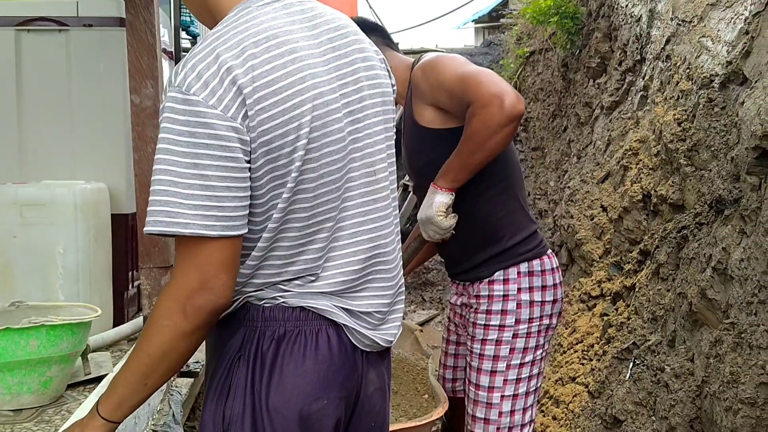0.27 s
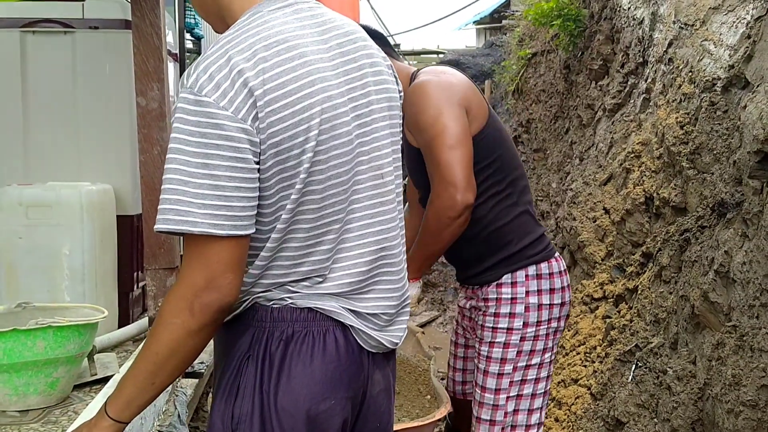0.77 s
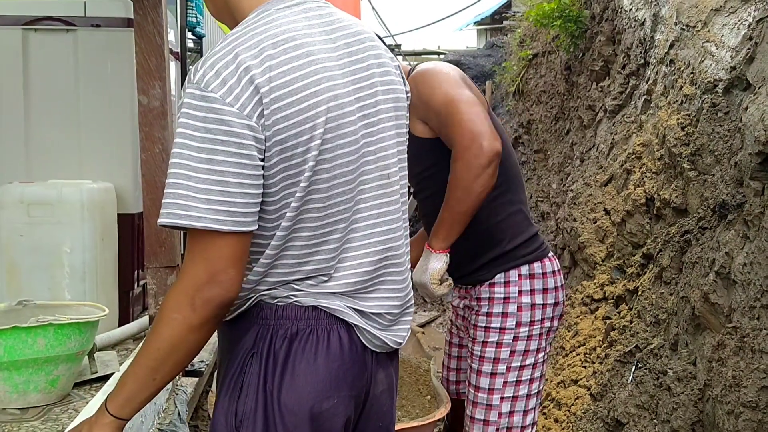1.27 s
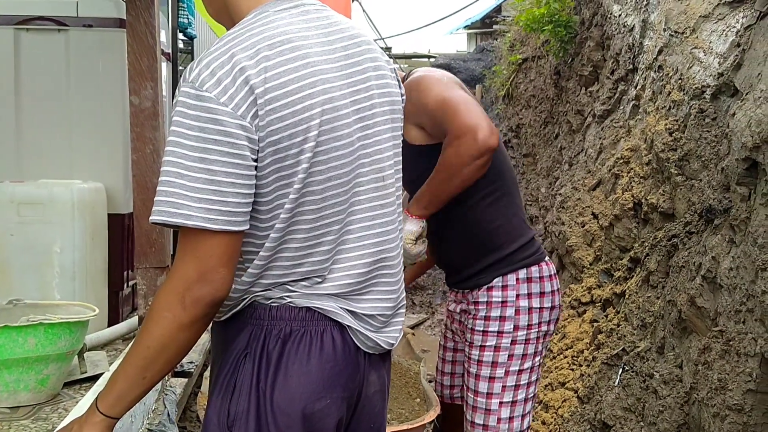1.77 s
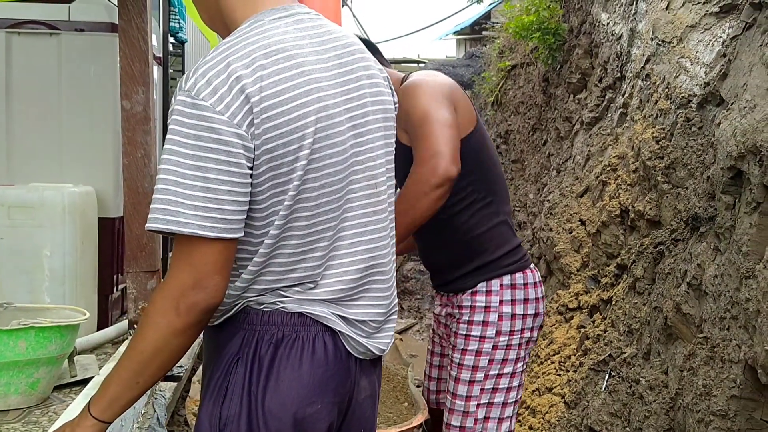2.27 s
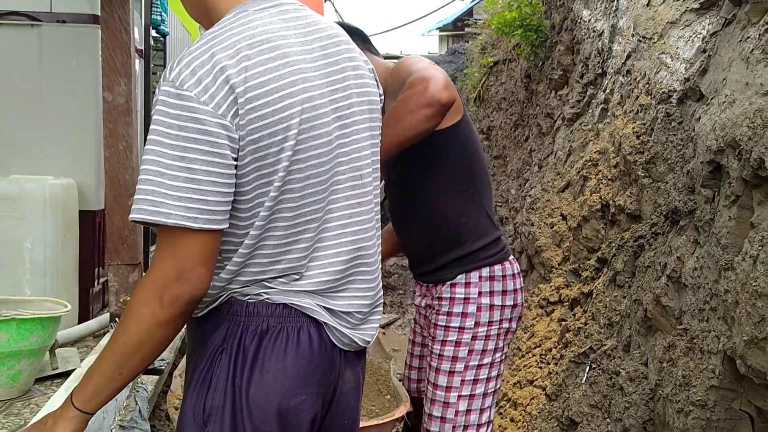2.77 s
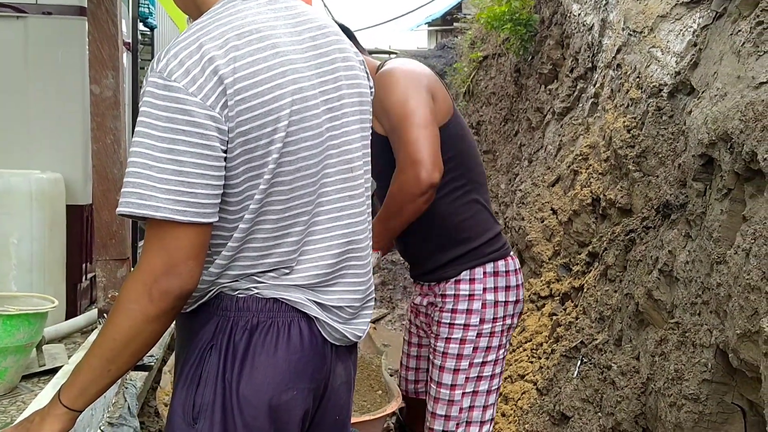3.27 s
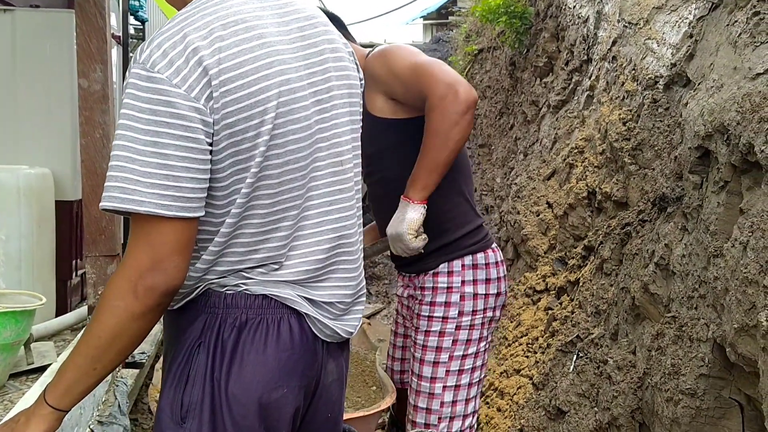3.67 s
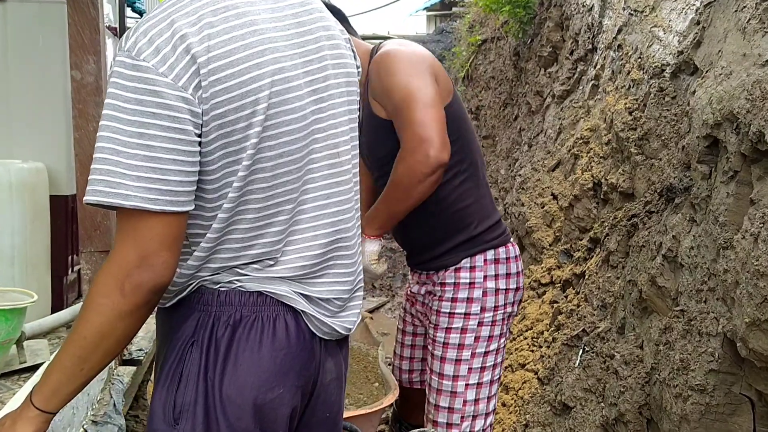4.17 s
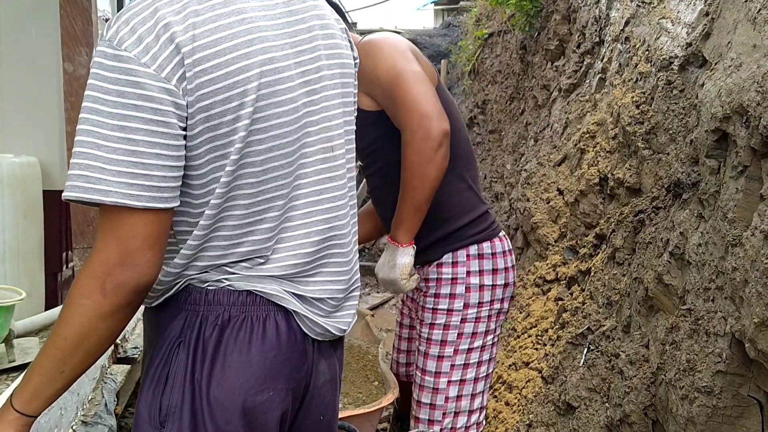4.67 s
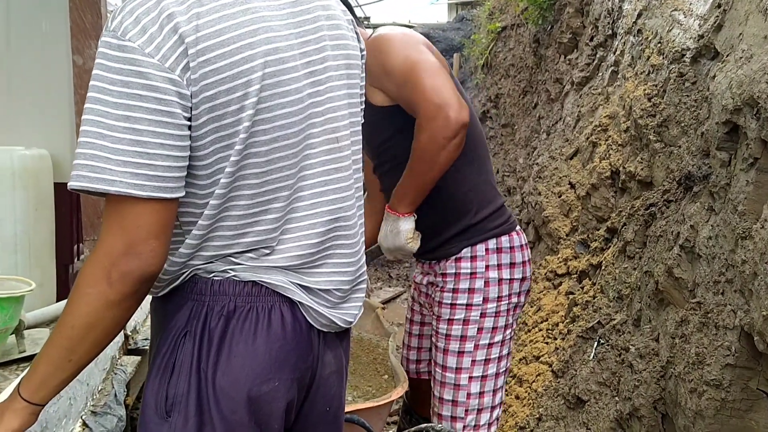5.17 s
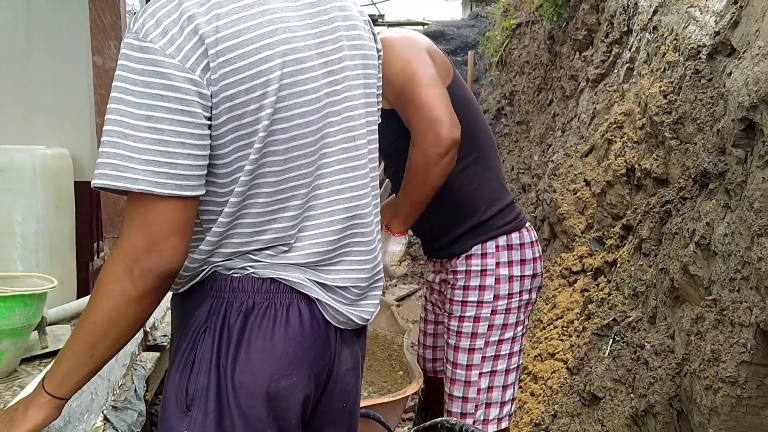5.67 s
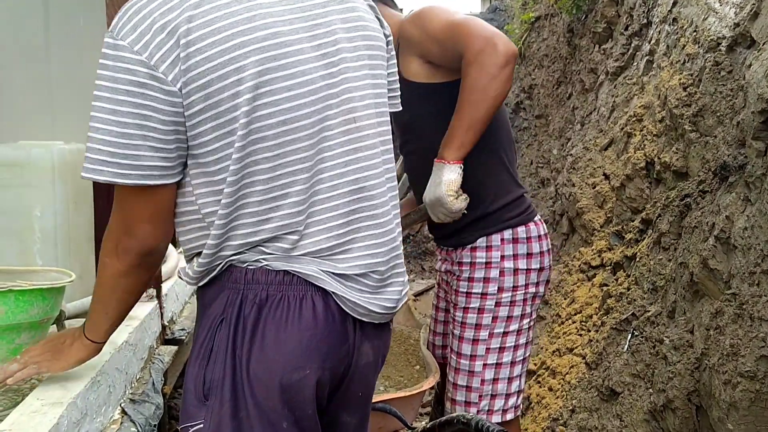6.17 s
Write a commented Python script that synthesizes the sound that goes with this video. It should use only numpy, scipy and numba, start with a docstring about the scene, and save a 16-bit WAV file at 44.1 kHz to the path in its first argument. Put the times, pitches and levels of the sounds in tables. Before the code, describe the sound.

A shovel crunches into gritty wet mortar close to the microphone in a narrow outdoor yard. Its short, grainy strokes come at about 0.2, 0.9, 1.6 to 1.9, 2.6, 3.4, 4.2, 5 and 6 seconds, some in quick clusters. Struck stones clink and ring briefly in most strokes, and small pebbles tick down softly between them. Further off, a rooster crows hoarsely once from about 1.2 to 3.4 seconds, with two short syllables and a long, rough, falling one. Another rooster is heard very faintly from afar at about 0.6 seconds and again from 5.4 to 6 seconds. Small birds give quiet, husky chirps and trills in the first second and mostly between 3.2 and 5 seconds. Underneath, a low motor drone and a soft distant rustle continue throughout, along with a barely audible pulsing cricket.

```python
"""A shovel crunches into gritty wet mortar again and again, close by in a narrow yard: grains crack under
the blade, struck stones ring, pebbles fall. Further off a rooster crows hoarsely, the two membranes of
its syrinx beating against each other, and another answers faintly from afar. Small birds trill,
a cricket pulses, a motor drones."""
import sys
import numpy as np
from scipy import signal
from scipy.io import wavfile
from scipy.ndimage import uniform_filter1d
from numba import njit

SR = 44100
rng = np.random.default_rng(int(sys.argv[2]) if len(sys.argv) > 2 else 0)


def to_wav(s):
    """Save 16-bit WAV."""
    ch = np.atleast_2d(s).T  # columns
    pcm = np.round(np.clip(ch, -1, 1) * 32767)  # PCM
    wavfile.write(sys.argv[1], SR, pcm.astype(np.int16))


N = 283062

# Hiss bands of fine sand. Each row: centre in Hz, width in Hz, gain in dB.
SAND_MODES = [(4990, 870, 2), (7380, 2800, -2.5), (9400, 1130, -5.5), (13400, 5100, -7)]


def shovel():
    """Grains of all sizes crack under the blade: it bites, slides ever softer, and stops."""
    # Each row: start in seconds, grit level in dB, bite re grit in dB, slide in seconds,
    # decay rate factor, then boom, thud, rasp and sand re grit in dB.
    strokes = [(0.2, -25, -1, 0.024, 0.95, -6, -12, 3, 1.5),
               (0.227, -21.5, -5, 0.017, 1.1, -7, 0, 5.5, -12),
               (0.934, -15, 12.5, 0.028, 1.06, -10, 0, -3, -11.5),
               (1.017, -29, 3.5, 0.022, 0.93, -14, -23, 3.5, -10),
               (1.055, -29.5, -3, 0.033, 1.1, -22, -13, 3, -5.5),
               (1.588, -15.5, -0.5, .1, 1.18, -12, -3, -2, -11.5),
               (1.702, -20, 5, 0.064, 0.8, -5.5, -6.5, -1.5, -14),
               (1.766, -22.5, 13, 0.028, 1.04, -18, -11, 2.5, -8),
               (1.863, -18, 9, 0.017, 1, -8, -1.5, -5.5, -18.5),
               (2.572, -15.5, 0, .09, 1.05, -13, 1.5, -1.5, -9),
               (3.43, -17, -2, 0.054, 1.04, -24, -5.5, -0.5, -8),
               (3.495, -22.5, 1, 0.035, 0.97, -18, -3, 3.5, -7.5),
               (4.172, -14, 6, .1, 0.98, -18.5, 0, -5, -14),
               (4.995, -15, -3, 0.051, 0.87, -5.5, -6.5, -3, -11),
               (5.066, -14.5, 1.5, 0.017, 1.3, -15, -1, -6, -19),
               (5.085, -16, 2, .075, 0.96, -20, -4, -2, -10.5),
               (5.941, -30, -2, 0.029, 0.63, -9, -13, 5, -1.5),
               (5.962, -18.5, -8, 0.033, 1.25, 3, 0, 2, -7), (6.055, -23.5, 4.5, .01, 1.5, -3, -3, -9, -4),
               (6.076, -18.5, 10.5, 0.024, 1.32, -5.5, -1, -2.5, -14.5)]
    # Resonances. Each row: centre in Hz, width in Hz, gain in dB.
    blade_modes = [(515, 51, 2), (813, 92, 3), (1010, 99, 3.5), (1255, 250, -1), (1470.5, 58.7, 2.5),
                   (1710, 146, -5.5)]
    boom_modes = [(93, 16.7, -8), (155, 64, -3)]
    thud_modes = [(274.4, 128, 0), (373, 141, -0.5)]
    rasp_modes = [(1933, 374, -0.5), (2160, 453, 1), (2660, 428, -0.5), (3386, 356, -5.5),
                  (3550, 222, -4.5)]
    # One value per part: grit, boom, thud, rasp, sand. Each stroke scales the two decay rates.
    slide_decay = [116, 150, 133, 60, 60]
    stop_decay = [332, 250, 292, 342, 330]
    rise_s = [0.0028, 0.013, 0.0052, 0.0021, 0.003]  # deep parts come late
    bite_colour_db, bite_t60_s = [-2, -10, 1, -3.8, -7.7], 0.035
    power, t = np.zeros((5, N)), np.arange(SR // 2) / SR
    column = lambda v: np.array(v)[:, None]
    for start_s, db, bite_db, slide_s, pace, *parts_db in strokes:
        slid_s = np.minimum(t, slide_s)
        fall_db = pace * (column(slide_decay) * slid_s + column(stop_decay) * (t - slid_s))
        bite = undb(bite_db + column(bite_colour_db)) * 1000. ** (-t / bite_t60_s)
        attack = np.minimum(t / column(rise_s), 1)
        env = attack * undb(db + column([0] + parts_db)) * np.hypot(undb(-fall_db), bite)
        span = power[:, int(start_s * SR):][:, :len(t)]
        span += env[:, :span.shape[1]] ** 2
    # the whole blade sticks and slips; each part also chatters alone
    judder = undb(0.68 * walk(90) + np.array([1.88 * walk(150) for _ in range(5)]))
    sizes = undb(3.625 * np.minimum(rng.exponential(size=N), 3.5))
    grains = unit(rng.standard_normal((5, N)) * sizes * judder)
    part_modes = (blade_modes, boom_modes, thud_modes, rasp_modes, SAND_MODES)
    return sum(body(part, modes) for part, modes in zip(np.sqrt(power) * grains, part_modes))


def stones():
    """Struck stones ring and decay, their pitch shaken by the mortar around them."""
    # Each row: start in seconds, pitch in Hz, peak in dB, T60 in seconds.
    strikes = [(0.938, 2600, -8.5, 0.027), (0.94, 933, -11.5, 0.19), (.941, 1410, -13, 0.098),
               (1.018, 1474, -22.5, 0.31), (1.02, 3550, -24, 0.083), (1.591, 1286, -17.5, 0.12),
               (1.704, 1437, -7, 0.027), (1.77, 2930, -10.5, 0.058), (1.8649, 1170, -0.5, 0.019),
               (1.8648, 2680, -4.5, 0.014), (2.576, 1536, -14, 0.19), (2.575, 274.7, -5, 0.16),
               (3.433, 2660, -5, 0.055), (3.434, 760, -14, 0.023), (4.174, 500, 0, 0.023),
               (4.998, 1560, -12.5, 0.056), (5.075, 790, -11.5, 0.059), (5.98, 155, -18, 0.099),
               (6.0802, 1010, -1, 0.015), (6.093, 1144, -16.5, 0.18), (5.452, 452, -38.5, 0.036),
               (6.285, 464, -31.5, 0.04)]
    out, shake = np.zeros(N), walk(150)
    for start_s, hz, db, t60_s in strikes:
        span, env = fading(start_s, t60_s)
        pitch_hz = hz * (1 + 0.025 * shake[span])
        out[span] += undb(db) * env * np.sin(2 * np.pi * np.cumsum(pitch_hz) / SR)
    return out


def pebbles():
    """Falling pebbles and clods: each a short tick with a puff of dust."""
    # Each row: start in seconds, level in dB, centre in Hz, dust re tick in dB.
    falls = [(0.0132, -37.5, 4860, -5), (0.0928, -40.5, 1430, 3), (.1471, -31.5, 1970, -30),
             (.3504, -40.5, 2920, 0), (0.3766, -36, 6850, -19), (0.6273, -33.5, 1300, -12),
             (0.645, -33.5, 1330, -5), (.6702, -34.5, 1270, -5), (.828, -27.5, 2670, -12.5),
             (2.8404, -38, 1912, -9), (2.9, -37.5, 1900, -27), (4.5795, -44, 2740, -9),
             (5.3207, -30, 1370, -15), (5.3595, -44, 3200, -6), (5.5563, -36, 2660, 6.5),
             (5.604, -41.5, 2380, -5.5), (5.665, -35, 1150, -17), (5.6838, -42.5, 2200, -1.5),
             (6.2364, -41, 1880, -1), (6.263, -41.5, 2170, -3), (6.3678, -43.5, 1642, 3.5)]
    out, noise = np.zeros(N), rng.standard_normal(N)
    dust = body(rng.standard_normal(N), SAND_MODES)
    for start_s, db, hz, dust_db in falls:
        span, env = fading(start_s, t60_s=0.045)
        tick = unit_band(noise[span], hz, 0.493 * hz)
        out[span] += undb(db) * env * (tick + undb(dust_db) * dust[span])
    return out


def rooster():
    """Two syrinx membranes beat against each other, adding sum and difference tones in the throat."""
    # Upper membrane, one list per syllable. Each row: time in seconds, pitch in Hz,
    # relative level in dB, roughness from 0 to 1.
    upper_syllables = [
        [(1.21, 779, -40, .3), (1.26, 794, -32.5, 0.44), (1.31, 796, -39.5, 0.35), (1.36, 760, -70, 0.54)],
        [(1.45, 820, -34.5, 0.05), (1.48, 855, -23, 0.16), (1.6, 850, -29, 0.23), (1.67, 840, -30, 0.27),
         (1.72, 833, -50, 0.33)],
        [(1.74, 846.5, -49, .1), (1.78, 850, -19, 0.14), (1.88, 850, -29, 0.21), (2.05, 831.4, -35.5, 0.58),
         (2.15, 829, -38.5, 0.54), (2.25, 830, -37.5, 0.46), (2.45, 804.4, -33.5, 0.42), (2.55, 791, -41, 0.3),
         (2.78, 774, -47, .35)],
    ]
    # Lower membrane. Each row: time in seconds, pitch in Hz, relative level in dB.
    lower_syllables = [
        [(1.21, 640, -55), (1.24, 640, -38), (1.37, 628, -65)],
        [(1.95, 676, -47), (2.05, 675, -45), (2.17, 669, -51), (2.27, 670, -42), (2.45, 656.3, -50),
         (2.53, 654, -37.5), (2.74, 626, -46), (2.88, 640.2, -37.5), (3.055, 607.6, -47.5), (3.075, 574.5, -43),
         (3.17, 560, -43.5), (3.23, 562, -43), (3.28, 506, -53), (3.36, 477, -53)],
    ]
    # Each row: centre in Hz, width in Hz, gain in dB.
    throat_modes = [(640, 216, 4), (850, 510, 1), (1656, 360, 0.5), (2350, 380, -4.5), (3300, 450, -7.5)]
    up_gate, (up_hz, up_db, up_rough) = contours(upper_syllables)
    low_gate, (low_hz, low_db) = contours(lower_syllables)
    low_rough = 0.09 + 0.605 * up_rough * up_gate  # partly caught from the upper membrane
    tuned_below_hz = 590  # below this pitch the throat is tuned to the third partial, which stands out
    tuned = np.clip((tuned_below_hz - low_hz) / 20, 0, 1)
    up_phase, upper = membrane(up_hz, up_rough, db_per_octave=-1.2, partials=4, jitter=0.06)
    low_phase, lower = membrane(low_hz, low_rough, db_per_octave=-2 - 6 * tuned, partials=5,
                                jitter=0.045, third_db=-1 + 16 * tuned)
    lower *= 1 + 0.2 * np.cos(low_phase / 2)  # every second cycle weaker
    up_env, low_env = up_gate * undb(up_db), low_gate * undb(low_db)
    coupling = np.cos(low_phase) + 0.63 * np.cos(2 * low_phase)
    beats = 1.06 * np.sqrt(up_env * low_env) * upper * coupling
    breath_env = 3 * up_rough * up_env * (1 + np.cos(up_phase)) + 8 * low_rough * low_env
    breath = breath_env * rng.standard_normal(N)
    voice = 0.22 * body(up_env * upper + 1.64 * low_env * lower + beats + breath, throat_modes)
    return signal.sosfilt(signal.butter(4, [520, 3800], "bandpass", fs=SR, output="sos"), voice)


def membrane(hz, rough, db_per_octave, partials, jitter, third_db=0):
    """Phase and pulse train of one syrinx membrane; roughness shakes period and amplitude."""
    wobble = 0.00297 * walk(25) + jitter * rough * (walk(300) + 0.35 * walk(60))
    phase = 2 * np.pi * np.cumsum(hz * (1 + wobble)) / SR
    waver_db = [1.4 * walk(30) for _ in range(partials + 1)]
    pulses = sum(undb(db_per_octave * np.log2(k) + waver_db[k] + third_db * (k == 3)) * np.cos(k * phase)
                 for k in range(1, partials + 1))
    return phase, pulses * undb(7.9 * rough * walk(150))


def far_rooster():
    """Only the two lowest partials of the answering crow carry this far."""
    # Each row: start in seconds, length in seconds, pitch in Hz, fall in Hz, relative level in dB.
    calls = [(0.61, 0.39, 690, 0.5, -56.5), (5.402, 0.15, 713, 28, -66), (5.617, .36, 891, 131, -62.5)]
    glides = [[(start_s, hz, db), (start_s + length_s, hz - fall_hz, db)]
              for start_s, length_s, hz, fall_hz, db in calls]
    gate, (hz, db) = contours(glides, ramp_samples=900)
    _, pulses = membrane(hz, rough=0.35, db_per_octave=1.16, partials=2, jitter=0.32)
    return gate * undb(db) * pulses


def birds():
    """Small birds: husky gliding whistles with a quick trill."""
    # Each row: start in seconds, length in seconds, pitch in Hz, glide in Hz, spread in Hz, level in dB.
    chirps = [(0.416, 0.049, 2530, -100, 200, -43), (0.489, 0.035, 2400, -6, 119, -38),
              (.545, 0.017, 2550, 0, 150, -42), (0.638, .044, 2840, 498, 80, -43),
              (.885, 0.026, 3625, 0, 60, -45), (3.233, 0.026, 2630, -100, 199, -44.5),
              (3.282, .034, 2503, -100, 200, -52), (3.384, 0.076, 2778, -3, 200, -44.5),
              (3.591, 0.057, 2810, -200, 200, -40), (3.789, 0.012, 2200, 250, 60, -46),
              (3.819, 0.062, 2720, -50, 218, -41), (3.98, .122, 3694, 0, 200, -56.5),
              (4.009, 0.06, 2790, -6, 200, -44.5), (4.066, 0.025, 2757, -53, 120, -35),
              (4.074, 0.026, 2350, -100, 80, -43.5), (4.102, .038, 2690, 0, 80, -48),
              (4.12, .03, 3050, 400, 50, -50), (4.148, 0.021, 3480, -300, 50, -45.5),
              (4.395, 0.13, 2750, -4, 200, -43.5), (4.736, 0.048, 3300, 0, 150, -57),
              (4.854, 0.18, 3320, -100, 150, -54.5), (5.679, 0.021, 2156, 2, 80, -44.5),
              (5.795, .03, 2150, 0, 79.7, -50)]
    out, trill_hz = np.zeros(N), 53
    for start_s, length_s, hz, glide_hz, spread_hz, db in chirps:
        t = np.arange(int(length_s * SR)) / SR
        husk = unit(uniform_filter1d(rng.standard_normal(SR // 4), size=110))[:len(t)]
        pitch_hz = hz + glide_hz * t / length_s + spread_hz * husk
        env = np.sin(np.pi * t / length_s) ** 0.27 * (1 + 0.27 * np.sin(2 * np.pi * trill_hz * t))
        out[int(start_s * SR):][:len(t)] += undb(db) * env * np.sin(2 * np.pi * np.cumsum(pitch_hz) / SR)
    return out


def insects():
    """One cricket pulses in a narrow band; many far ones blur into a hiss above it."""
    pulse_hz, level_db = 11.76, -69
    pulse = np.sin(2 * np.pi * (pulse_hz * np.arange(N) / SR + 0.92))
    gate = np.clip(2.2 * pulse + 0.5, 0, 1)
    cricket = gate * unit(svf(rng.standard_normal(N), hz=7620., width_hz=90.))
    hiss = unit_band(rng.standard_normal(N), hz=8900, width_hz=1300)
    return undb(level_db) * cricket + undb(level_db + walk(10)) * hiss


def yard():
    """Motor drone, distant bustle and rustle: third-octave noise bands, each flickering alone."""
    # Spectral shapes. Each row: frequency in Hz, relative density in dB.
    drone_bustle_shape = [(24, -49), (40, -80.5), (69, -2.5), (222, -5), (309, -13.5), (635, -18.5),
                          (687, -8), (834, -25), (1410, -15), (1680, -23.5), (2960, -17.5), (4200, -56.5),
                          (5460, -69), (9240, -120)]
    rustle_shape = [(4200, 17), (5300, -3.5), (7000, 7), (10500, -6), (12500, -5.5), (15000, 2)]
    # Each row: time in seconds, then drone, bustle and rustle levels in dB.
    levels = [(0, -39.5, -48.5, -54.5), (.89, -38, -47, -53.5), (1.2, -44.5, -50, -58.5),
              (2, -47, -54, -63.5), (2.9, -46.5, -47.5, -58.5), (3.2, -48, -52.5, -67.5),
              (3.65, -44, -53.5, -62), (4.6, -47, -53.5, -66), (5.3, -46, -51.5, -62),
              (5.9, -44, -51.5, -61), (6.25, -46.5, -49.5, -53.5), (6.42, -48.5, -53, -64)]
    groups, gusts = [0, 0, 0], walk(17)
    for hz in 47 * 2 ** (np.arange(26) / 3):
        group = int(hz > 400) + int(hz > 4200)  # 0 drone, 1 bustle, 2 rustle
        shape_hz, shape_db = np.transpose(rustle_shape if group == 2 else drone_bustle_shape)
        db = np.interp(np.log(hz), np.log(shape_hz), shape_db)
        flicker_db = 1.5 * walk(9) + 2.5 * (hz < 130) * walk(25) + 1.2 * (group == 2) * gusts
        band = unit_band(rng.standard_normal(N), hz, hz / 3) * np.sqrt(hz)
        groups[group] += undb(db + flicker_db) * band
    _, levels_db = contours([levels])
    return sum(undb(db) * unit(noise) for noise, db in zip(groups, levels_db))


def echo(x, wet_db, t60_s):
    """Direct sound plus duller reflections scattered from walls and earth bank."""
    t = np.arange(int(t60_s * SR)) / SR
    scatter = svf(rng.standard_normal(len(t)), hz=1680., width_hz=5800.)
    tail = scatter * 1000. ** (-t / t60_s) * (t > 0.006)
    return x + undb(wet_db) * signal.fftconvolve(x, tail / np.sqrt(np.sum(tail ** 2)))[:N]


def undb(db):
    return 10 ** (np.asarray(db) / 20)


def unit(x):
    return x / np.sqrt(np.mean(x ** 2))


@njit
def svf(x, hz, width_hz):
    """State-variable band-pass, gain 1 at the centre."""
    y, band, low = np.empty(len(x)), 0., 0.
    g, damping = np.tan(np.pi * hz / SR), width_hz / hz
    for i in range(len(x)):
        v = (band + g * (x[i] - low)) / (1 + g * (g + damping))
        band, low, y[i] = 2 * v - band, low + 2 * g * v, damping * v
    return y


def unit_band(x, hz, width_hz):
    """Two band-passes in series, output RMS 1."""
    hz, width_hz = float(hz), float(width_hz)
    return unit(svf(svf(x, hz, width_hz), hz, width_hz))


def body(x, modes):
    """Parallel resonances, scaled so that white noise keeps its level."""
    def ring(drive):
        return sum((-1) ** k * undb(db) * svf(drive, float(hz), float(width_hz))
                   for k, (hz, width_hz, db) in enumerate(modes))
    return ring(x + 1e-18) / np.sqrt(np.sum(ring(signal.unit_impulse(4096)) ** 2))


def walk(rate_hz):
    """Random steps smoothed twice, RMS 1."""
    hold = int(SR / rate_hz)
    steps = np.repeat(rng.standard_normal(N // hold + 1), hold)
    return unit(uniform_filter1d(uniform_filter1d(steps, hold), hold)[:N])


def contours(tables, ramp_samples=200):
    """A gate open during each table, and the columns interpolated per sample."""
    t, rows = np.arange(N) / SR, np.concatenate(tables)
    gate = sum((t >= table[0][0]) & (t < table[-1][0]) for table in tables)
    columns = [np.interp(t, rows[:, 0], column) for column in rows.T[1:]]
    return uniform_filter1d(1. * gate, ramp_samples), columns


def fading(start_s, t60_s):
    """Sample span and envelope of a sharp attack with exponential decay."""
    i = int(start_s * SR)
    t = np.arange(min(int(t60_s * SR), N - i)) / SR
    return slice(i, i + len(t)), 1000. ** (-t / t60_s) * np.minimum(t / 0.00095, 1)


def scene():
    """Mono mix; farther sources carry more echo."""
    yard_t60_s = 0.19
    near = echo(shovel() + stones() + pebbles(), wet_db=-15.5, t60_s=0.64 * yard_t60_s)
    middle = echo(rooster() + birds(), wet_db=-7.5, t60_s=yard_t60_s)
    far = echo(far_rooster(), wet_db=1.0, t60_s=yard_t60_s)
    return (near + middle + far + insects() + yard())[None]


def record(dry):
    """A phone's small microphone drops deep bass; the phone clips the hardest blows and cuts the top."""
    bass_hz, port_hz, top_hz = 78, 7950., 15450
    heard = signal.sosfilt(signal.butter(2, bass_hz, "highpass", fs=SR, output="sos"), dry)
    heard -= 0.76 * np.array([svf(c, port_hz, width_hz=490.) for c in heard])  # notch of the case port
    clipped = np.clip(heard, -0.98, 0.98)
    return signal.sosfilt(signal.ellip(10, 0.2, 70, top_hz, fs=SR, output="sos"), clipped)


dry = scene()
out = record(dry)
to_wav(out)
```